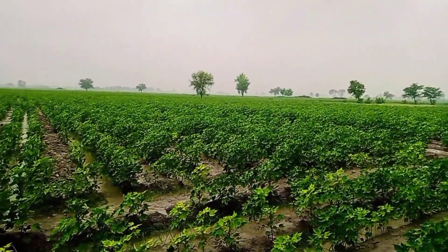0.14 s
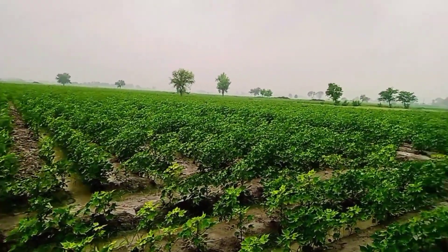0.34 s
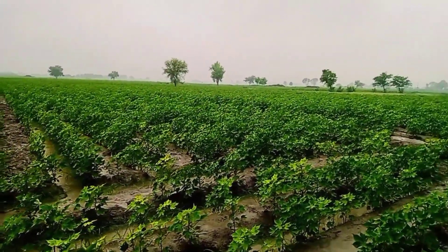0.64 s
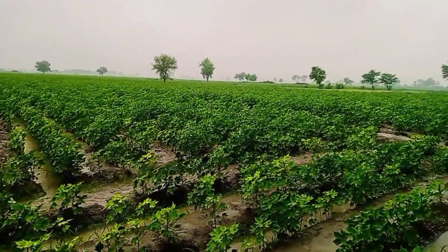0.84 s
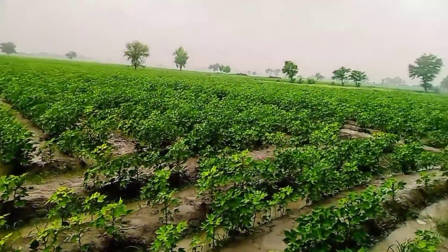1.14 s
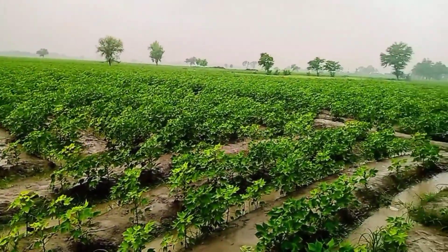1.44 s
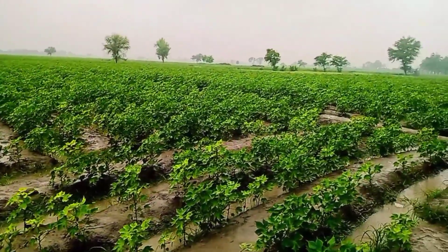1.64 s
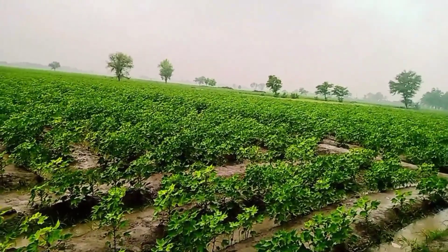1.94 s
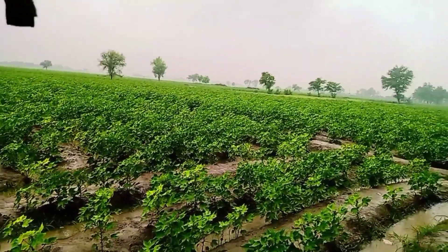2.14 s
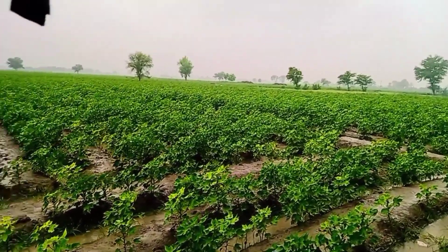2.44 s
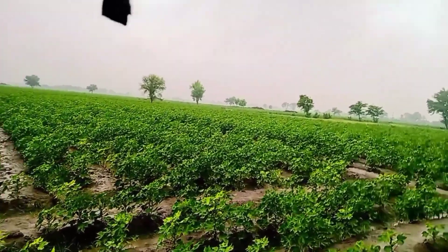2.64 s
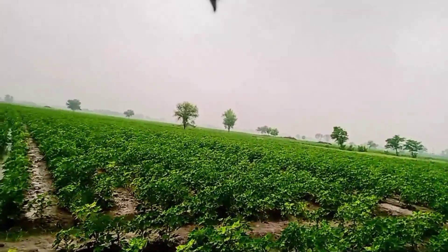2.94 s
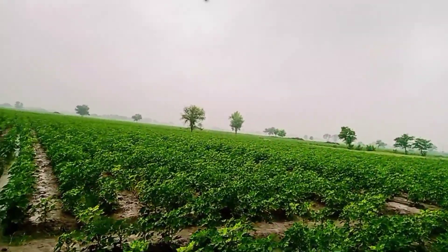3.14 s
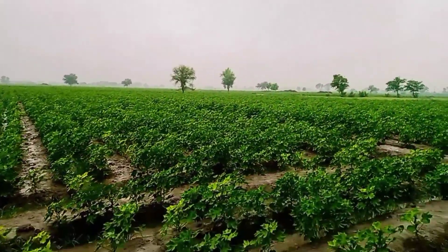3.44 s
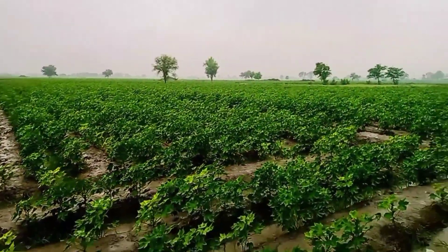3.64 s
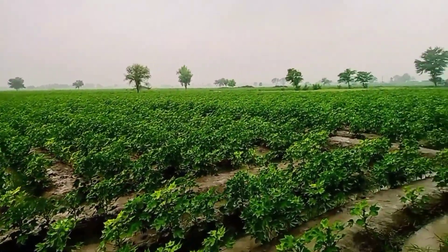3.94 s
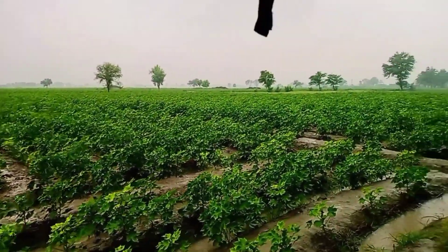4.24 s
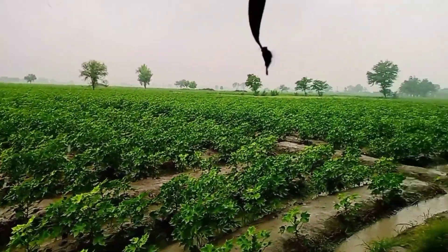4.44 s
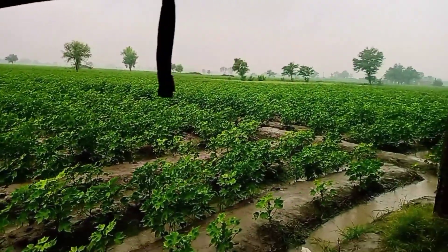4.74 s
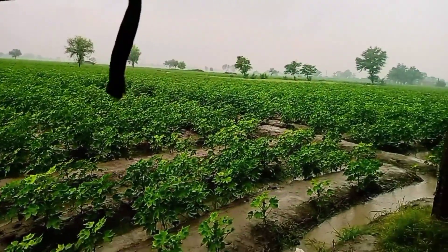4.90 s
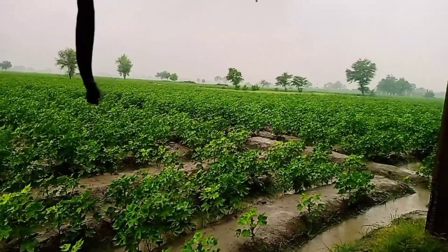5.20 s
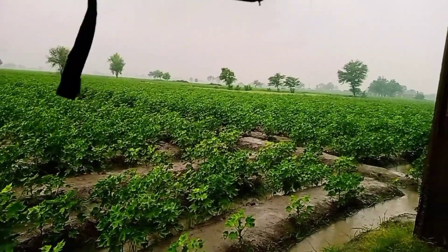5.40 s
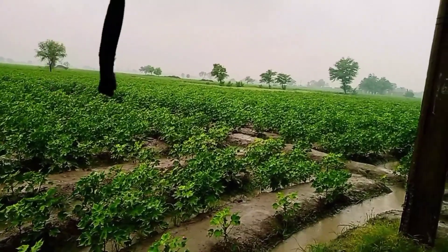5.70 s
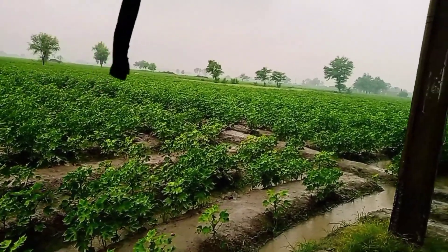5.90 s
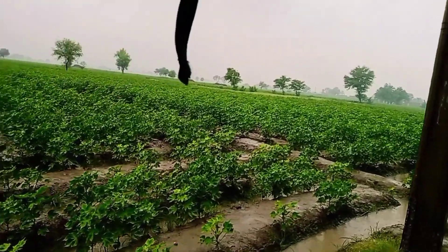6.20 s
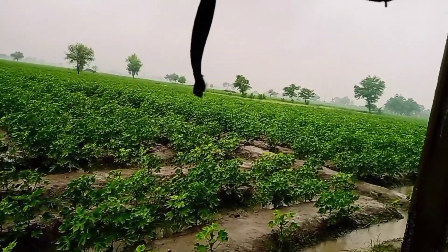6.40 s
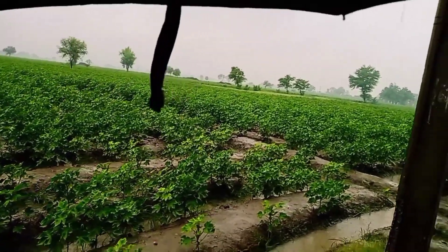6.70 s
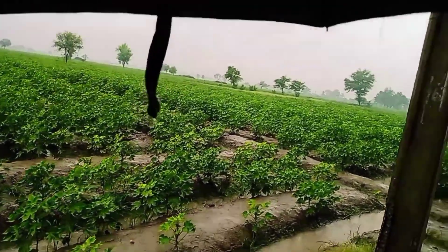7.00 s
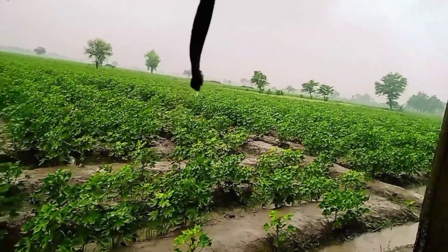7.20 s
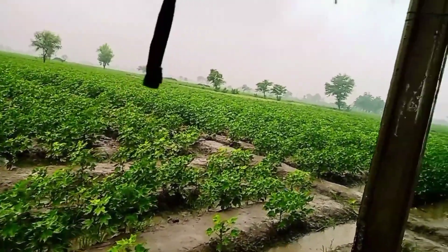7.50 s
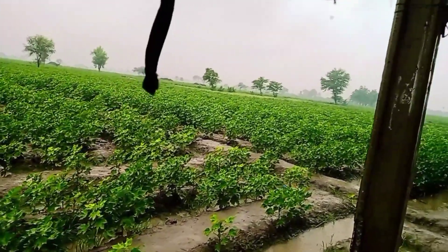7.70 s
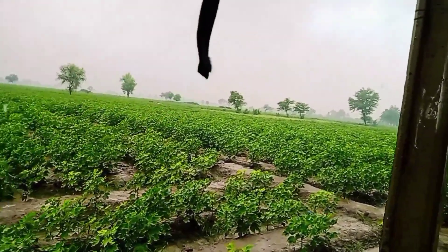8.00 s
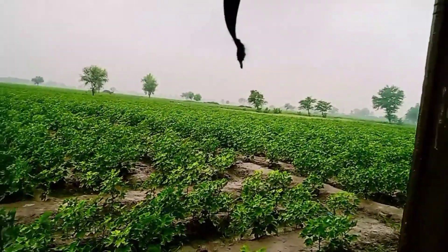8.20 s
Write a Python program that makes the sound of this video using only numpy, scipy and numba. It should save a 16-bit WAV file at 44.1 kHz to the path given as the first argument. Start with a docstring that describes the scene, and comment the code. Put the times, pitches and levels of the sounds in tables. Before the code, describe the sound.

Under a small cloth cover, heavy drips knock and plop close by against soft continuous rain, with faint far whistles and three bright bird chirps.

```python
"""Steady rain on leafy, muddy fields, heard from under a small cloth shelter.
From the start, far rain hisses (shaped noise), low wind rumbles and near drops patter (short rings).
Fat drips soon thud on the taut cloth (rings and noise bursts), most crowded from about 4.5 to 7.5 s.
Far birds whistle from 0.5 s, a near bird chirps three times from 0.6 s (gliding sines), and a cricket
trills twice from 0.8 s (overlapping high rings). A gain control ducks the hiss after the loudest drips."""
import sys
import numpy as np
from scipy import signal
from scipy.fft import rfft, irfft
from scipy.io import wavfile
from scipy.ndimage import uniform_filter1d
from numba import njit

SR = 44100
rng = np.random.default_rng(int(sys.argv[2]) if len(sys.argv) > 2 else 0)


def put_to_file(sound):
    """Save the sound as 16-bit audio at rate SR, in the file named by the first command-line argument."""
    columns = np.atleast_2d(sound).T  # one column per channel
    safe = np.clip(columns, -1, 1)
    whole_steps = np.round(safe * 32767)
    wavfile.write(sys.argv[1], SR, whole_steps.astype(np.int16))


N = 368214
ATTACK_S = 0.008  # bird notes swell for this long
SILENT_DB = -14.5  # level at the ends of a bird note, against its full level


def undb(db):
    """Turn decibels into a gain factor."""
    return 10 ** (np.asarray(db) / 20)


def unit(x):
    """Scale a sound to an rms (average strength) of 1."""
    return x / np.sqrt(np.mean(x ** 2))


def tone_of(points, hz):
    """Read a (f/Hz, level/dB) table at any pitch, with pitch on a log scale as the ear hears it."""
    table_hz, table_db = np.array(points).T
    return np.interp(np.log(hz), np.log(table_hz), table_db)


def level_at(t, points):
    """Read each column of a table at times t, by straight lines between its rows."""
    s, *columns = np.transpose(points)
    return [np.interp(t, s, column) for column in columns]


def band(x, lo_hz, hi_hz):
    """Keep the sound between two pitches and weaken the rest."""
    edges = [lo_hz, min(hi_hz, 0.45 * SR)]
    return signal.sosfilt(signal.butter(2, edges, "band", fs=SR, output="sos"), x)


def walk(rate):
    """Wander at random: levels held for 1 / rate seconds, smoothed twice, with a spread near 1."""
    hold = int(SR / rate)
    steps = np.repeat(rng.standard_normal(N // hold + 1), hold)
    return 2.42 * uniform_filter1d(uniform_filter1d(steps, hold), hold)[:N]


@njit
def grains(start, hz, cycles, size, n, rise):
    """Add up sines that each swell briefly, then die by 60 dB in their number of cycles."""
    out = np.zeros(n)
    for k in range(len(start)):
        turn = 2j * np.pi * hz[k] / SR
        fade = np.log(1000.) / cycles[k] * hz[k] / SR
        slow_step = np.exp(turn - fade)
        fast_step = np.exp(turn - rise * fade)
        slow = fast = size[k] + 0j
        # the difference of a slow and a fast fade starts at nothing, swells and dies
        for i in range(start[k], min(n, start[k] + int(cycles[k] * SR / hz[k]))):
            slow, fast = slow * slow_step, fast * fast_step
            out[i] += slow.imag - fast.imag
    return out


@njit
def follow(x, attack, release):
    """Trace the loudness of a sound: rise fast, sink slowly."""
    out, level = np.empty(len(x)), 0.
    for i in range(len(x)):
        level += (x[i] - level) * (attack if x[i] > level else release)
        out[i] = level
    return out


def ring(s, hz, cycles, db):
    """Ring at times s; a soft drop pushes for a moment, so each ring swells before it fades."""
    hz = np.clip(hz, 60, 0.45 * SR)
    start = np.clip(s * SR, 0, N - 1).astype(np.int64)
    return grains(start, hz, cycles + 0 * hz, undb(db) + 0 * hz, N, 2.74)  # 0 * hz: one value per ring


def burst(s, db, t60_s, lo_hz, hi_hz):
    """Splash noise that spreads quickly from each time s, then dies by 60 dB in t60_s."""
    spread_s = 0.00031
    kick = np.zeros(N)
    np.add.at(kick, np.clip(s * SR, 0, N - 1).astype(int), undb(db))
    shape = signal.lfilter([1], [1, -np.exp(-np.log(1000) / (t60_s * SR))], kick)
    soft = np.exp(-1 / (spread_s * SR))
    shape = signal.lfilter([(1 - soft) ** 2], [1, -2 * soft, soft ** 2], shape)
    return shape * unit(band(rng.standard_normal(N), lo_hz, hi_hz))


def hiss():
    """Countless far drops blur into noise: half-octave bands swell together and flicker alone."""
    # Relative tone of the far rain: (f/Hz, level/dB)
    hiss_tone = [(65, -40), (110, -13), (174, -10), (953, -7), (1180, -17.5), (1360, 3.5), (2160, 3.5),
                 (2720, -6.5), (4140, -13), (8800, -12.5), (13400, -33), (15200, -16), (16500, -45)]
    white = rfft(rng.standard_normal(N))
    hz = np.maximum(np.fft.rfftfreq(N, 1 / SR), 1)
    coloured = white * undb(tone_of(hiss_tone, hz))
    out, swell = 0, walk(9)
    for centre in 100 * 2 ** np.arange(0, 8, 0.5):
        # each band fades smoothly into its neighbours
        share = np.cos(np.pi / 2 * np.clip(2 * np.log2(hz / centre), -1, 1)) ** 2
        flicker_db = 0.8 * swell + 1.8 * walk(45)
        out = out + undb(flicker_db) * irfft(coloured * share, N)
    return out / np.std(band(out, 1200, 2800))


def far_rain_and_wind():
    """The far hiss and the low rumble of wind, both noise that follows levels set over time."""
    # Far rain and wind over time: (t/s, hiss level/dB, wind level/dB)
    weather = [(0.0, -37, -56.5), (2.49, -38.5, -46.5), (2.67, -38, -38.5), (3.35, -39, -47),
               (4.93, -37.5, -40), (5.35, -35, -56), (6.28, -38, -40), (6.6, -42, -53), (7.65, -43, -42.5),
               (8.35, -38, -65)]
    hiss_db, wind_db = level_at(np.arange(N) / SR, weather)
    rumble = unit(band(rng.standard_normal(N), 61, 110))
    wind = undb(wind_db + 0.93 * walk(5.5)) * rumble
    return undb(hiss_db) * hiss() + wind


def patter():
    """Near drops on leaves and cloth, mostly faint; each ticks almost at once on five short pitches."""
    # Relative tone of the ticks: (f/Hz, level/dB)
    tick_tone = [(200, -6.5), (450, -2), (1000, -0.5), (2000, 11.5), (3500, -5.5), (6000, -6), (9000, -11),
                 (13000, -51), (15300, -22)]
    # Near drops over time, stronger when the cloth sheds water: (t/s, level/dB)
    busy = [(0.0, -37.5), (0.58, -35.5), (1.09, -36), (2.07, -36.5), (2.86, -32), (3.23, -36.5),
            (4.67, -36.5), (5.6, -26.5), (5.95, -32.5), (6.21, -33.5), (6.33, -36), (6.49, -36.5),
            (6.91, -36), (7.11, -40), (7.74, -37.5), (7.91, -30.5), (8.35, -41)]
    count = 2200  # drops
    when, size, place = rng.random((count, 3)).T
    drop_db = np.minimum(-4.2 * np.log(1 - size), 19)
    out = 0
    for delay, lean, long in rng.random((count, 5, 3)).transpose(1, 2, 0):
        hz = 200 * (15800 / 200) ** ((place + 0.55 * lean) % 1)  # 200 to 15800 Hz
        cycles = (5.3 + hz / 500) * (0.32 + 1.53 * long ** 2)
        tick_db = drop_db + tone_of(tick_tone, hz) + 10 * np.log10(hz)
        out = out + ring(when * N / SR + 0.008 * delay ** 3, hz, cycles, tick_db)
    busy_db, = level_at(np.arange(N) / SR, busy)
    return undb(busy_db + 1.32 * walk(22)) * unit(out)


def drips():
    """Fat drips: the cloth thuds and plops on, the strike taps, spray ticks, droplets land around it."""
    # Loud drips, levels relative within each part:
    # (t/s, tap level/dB, tap f/Hz, thud level/dB, thud f/Hz, splash level/dB)
    fat_drips = [(0.1514, -19.5, 1350, -42, 594, -52), (0.3283, -19.5, 976, -33.5, 412, -24.5),
                 (0.3533, -14, 2400, -39, 430, -45), (0.4741, -30, 960, -24.5, 910, -26.5),
                 (0.496, -16, 1960, -30.5, 450, -44), (0.8883, -5.5, 1066, -16.5, 315, -19.5),
                 (0.9757, -25, 2000, -46, 594, -25.5), (1.5526, -31, 890, -29.5, 890, -27),
                 (1.7973, -12, 3020, -28.5, 420, -18.5), (1.9444, -20, 2240, -24.5, 410, -40),
                 (2.1029, -9, 3350, -29, 536, -10), (2.1279, -11, 2180, -26.5, 790, -42),
                 (2.1457, -16.5, 2280, -33, 433, -28), (2.2707, -19, 1360, -40, 460, -24),
                 (2.5286, -13.5, 1850, -47, 711, -37), (2.5454, -11.5, 1330, -33, 750, -38),
                 (2.5653, -13, 1300, -33.5, 694, -34), (2.7485, -9.5, 2430, -14.5, 314, -21),
                 (2.837, -13.5, 2420, -32.5, 315, -25), (2.9766, -15, 1560, -26.5, 510, -50),
                 (3.0834, -21, 1440, -31.5, 480, -40), (3.6611, -21, 2260, -35.5, 216, -25),
                 (3.683, -15.5, 1790, -36, 510, -25), (4.011, -22, 1980, -36, 859, -27),
                 (4.2538, -22, 1480, -30.5, 842, -38), (4.3035, -18, 1560, -37, 810, -37),
                 (4.337, -17, 1290, -27.5, 695, -33), (4.523, -13, 885, -12.5, 680, -24),
                 (4.6012, -19, 1820, -28, 804, -26), (4.6164, -6.5, 1380, -21, 750, -14),
                 (4.7186, -2.5, 2030, -14.5, 526, -45.5), (4.7688, -4.5, 2200, -20.5, 770, -38),
                 (4.8758, -24, 1860, -34, 517, -23.5), (4.913, -16, 900, -21, 426, -43),
                 (4.9488, -11.5, 1530, -31, 237, -43), (4.9806, -14.5, 1680, -32, 540, -31),
                 (4.996, -12.5, 2910, -18.5, 316, -17.5), (5.0193, -15, 1770, -28.5, 369, -15.5),
                 (5.0903, -16.5, 1400, -29.5, 726, -38), (5.1506, -19, 2080, -33, 345, -37),
                 (5.1745, -18, 2110, -26, 271, -23.5), (5.215, -15, 870, -25, 325, -22),
                 (5.3133, -7.5, 2860, -20, 420, -35), (5.3211, -6, 1830, -32, 300, -31),
                 (5.3673, -9.5, 964, -16, 310, -33), (5.425, -13, 1130, -20, 557, -24),
                 (5.4991, -17, 2050, -38, 412, -22.5), (5.5498, -8, 2000, -16, 626, -35),
                 (5.5735, -7.5, 1350, -20.5, 393, -17.5), (5.5957, -6, 2200, -21, 714, -23),
                 (5.659, -5, 890, -14, 523, -37), (5.6931, -6, 1000, -14.5, 446, -26),
                 (5.701, -7, 950, -16, 450, -31), (5.7559, -9, 920, -17.5, 340, -20),
                 (5.8165, -17, 1320, -23.5, 193, -13), (6.0433, -21, 1830, -10.5, 512, -23),
                 (6.0683, -7.5, 2640, -18, 433, -30), (6.0802, -11.5, 1000, -34, 818, -21),
                 (6.0944, -22, 1460, -47, 727, -17), (6.118, -10, 2240, -40, 851, -22),
                 (6.1591, -10, 2030, -35, 583, -25), (6.1778, -6.5, 1840, -11, 630, -23),
                 (6.2313, -3, 2100, -15.5, 395, -16.5), (6.3064, -10, 930, -19, 813, -24),
                 (6.3303, 0, 2100, -13, 800, -22), (6.357, -9, 2110, -34, 376, -33),
                 (6.5322, -11.5, 1970, -37.5, 242, -18.5), (6.7115, -16, 1780, -36, 425, -26),
                 (6.7705, -21.5, 1780, -31.5, 630, -49), (6.8669, -11.5, 2730, -35.5, 238, -24.5),
                 (7.0115, -15.5, 1370, -26, 343, -22.5), (7.0314, -14.5, 1480, -33, 423, -22.5),
                 (7.0817, -6, 1110, -20, 430, -20), (7.1822, -10, 1760, -24, 237, -39),
                 (7.2875, -5.5, 2090, -23, 650, -24), (7.3573, -16, 2040, -33.5, 447, -23.5),
                 (7.389, -12, 1930, -27, 674, -34), (7.671, -26, 1710, -55, 762, -25.5),
                 (7.7986, -24, 1330, -30, 288, -30), (7.8295, -13.5, 1750, -23.5, 804, -41),
                 (7.8492, -9, 2140, -24, 604, -24), (7.8718, -10.5, 1520, -26.5, 280, -44),
                 (8.0021, -27, 850, -22, 840, -22.5), (8.134, -12, 1670, -27, 690, -20.5),
                 (8.327, -13, 1940, -34, 899, -33)]
    # Wet cloth under spray, before random spread: (f/Hz, relative level/dB, shortest 60 dB fade/s)
    wet_cloth = [(3870, -2.5, 0.0098), (4880, -13.5, 0.016), (6100, -16, 0.013), (7970, -21, 0.01),
                 (9130, -17.5, 0.011)]
    s, tap_db, tap_hz, thud_db, thud_hz, splash_db = np.transpose(fat_drips)
    # the tap, the short thud and the plop that rings on
    out = ring(s, tap_hz, 18, tap_db + 7)
    out += ring(s, 1.153 * thud_hz, 3.73, thud_db + 19)
    out += ring(s, thud_hz, 14.8, thud_db + 10)
    # noise of thud, tap and splash
    out += burst(s, thud_db + 0.5, 0.095, 151, 770)
    out += burst(s, tap_db - 10, 0.047, 1120, 2920)
    out += burst(s, splash_db + 0.5, 0.013, 2800, 7100)
    out += burst(s, splash_db - 18, 0.12, 4360, 6350)
    out += burst(s, splash_db - 19, 0.012, 14700, 17500)
    # four droplets, from 4 ms before the drip to 41 ms after
    for delay, lean, weak in rng.random((len(s), 4, 3)).transpose(1, 2, 0):
        landing = s - 0.004 + 0.045 * delay
        bend = 0.653 + 0.93 * lean
        out += ring(landing, tap_hz * bend, 13.5, tap_db - 5.5 - 11 * weak)
        out += ring(landing, thud_hz * bend, 8.8, thud_db + 5.5 - 11 * weak)
    # spray ticks on the wet cloth; the weaker, the longer
    chance = rng.random((len(s), len(wet_cloth), 3)).transpose(1, 2, 0)
    for (hz, db, t60_s), (delay, lean, weak) in zip(wet_cloth, chance):
        spray_hz = hz * (0.911 + 0.111 * lean)
        cycles = t60_s * hz * (1 + 5.5 * weak ** 2)
        out += ring(s + 0.02 * delay ** 2, spray_hz, cycles, splash_db + db + 13.5 - 13 * weak)
    return out


def note(start, length, start_hz, end_hz, db, buzz=0):
    """One gliding note that swells and fades, as (t/s, f/Hz, level/dB, buzz 0-1) points."""
    points = []
    for s, dip in [(0, SILENT_DB), (ATTACK_S, 0), (length - ATTACK_S, 0), (length, SILENT_DB)]:
        hz = start_hz + (end_hz - start_hz) * s / length
        points.append((start + s, hz, db + dip, buzz))
    return points


def bird(calls, echo_db):
    """Near-sine whistles; a buzz shakes the pitch and deepens the flutter; bushes return a short echo."""
    t, out = np.arange(N) / SR, np.zeros(N)
    shake_hz = 330 * (1 + 0.17 * walk(60))
    shake = np.sin(2 * np.pi * np.cumsum(shake_hz) / SR)
    flutter = np.clip(walk(170), -2.5, 1.5)
    for call in calls:
        on = (t > call[0][0]) & (t < call[-1][0])
        hz, db, buzz = level_at(t[on], call)
        shaken_hz = hz + 640 * buzz * shake[on] + 30 * flutter[on]
        phase = 2 * np.pi * np.cumsum(shaken_hz) / SR
        gain = undb(db + (2 + 1.7 * buzz) * flutter[on])
        out[on] += np.sqrt(2) * gain * np.sin(phase)
    lag = t[:SR // 4]
    echo = rng.standard_normal(len(lag)) * np.exp(-np.log(1000) * lag / 0.22)  # fades 60 dB in 0.22 s
    echo /= np.sqrt(np.sum(echo ** 2))
    return out + undb(echo_db) * signal.fftconvolve(out, echo)[:N]


def far_birds():
    """Far birds: plain whistles that hold or gently glide in pitch, with an echo."""
    # Far whistles: (start t/s, length/s, start f/Hz, end f/Hz, level/dB)
    far_calls = [(0.494, .05, 1960, 1950, -36), (0.573, 0.079, 1916, 1915, -33),
                 (0.644, 0.066, 2090, 2090, -35.5), (2.475, 0.056, 1342, 1400, -38.5),
                 (2.678, 0.077, 1630, 1697, -34.5)]
    return bird([note(*row) for row in far_calls], echo_db=-5)


def chirp(start, whistle, whistle_db, break_hz, buzz, buzz_db):
    """Lead notes, then a whistle that rises and swells, jumps up in pitch and buzzes away."""
    # Two faint notes ahead of every chirp:
    # (lead/s, length/s, start f/Hz, end f/Hz, level/dB, buzz 0-1)
    lead_notes = [(.087, 0.086, 5750, 5700, -46, .3), (0.052, 0.036, 4250, 4800, -44, 0.4)]
    whistle_start_hz, buzz_start_hz, buzz_top_hz, buzz_end_hz = 4575, 5980, 6350, 6000
    break_s, buzz_rise_s = 0.006, 0.0208
    onset_db = -6.5  # against the level of the whistle
    buzz_at_break, buzz_full = 0.2, 0.58  # share 0-1
    flip = start + whistle
    main = [(start - ATTACK_S, whistle_start_hz, whistle_db + SILENT_DB, 0),
            (start, whistle_start_hz, whistle_db + onset_db, 0),
            (flip, break_hz, whistle_db, buzz_at_break),
            (flip + break_s, buzz_start_hz, buzz_db, buzz_full),
            (flip + buzz_rise_s, buzz_top_hz, buzz_db, buzz_full),
            (flip + buzz, buzz_end_hz, buzz_db + SILENT_DB, buzz_full)]
    return [main] + [note(start - lead, *rest) for lead, *rest in lead_notes]


def near_bird():
    """A near bird: a rising whistle that breaks into a buzz, with an echo."""
    # Chirps: (start t/s, whistle length/s, whistle level/dB, f at the break/Hz,
    # buzz length/s, buzz level/dB)
    chirps = [(.716, .034, -20.5, 5120, 0.073, -22), (3.32, 0.059, -20.5, 5110, 0.064, -24),
              (5.642, .054, -19, 5370, 0.054, -20.5)]
    calls = []
    for row in chirps:
        calls += chirp(*row)
    return bird(calls, echo_db=-6)


def cricket():
    """Slightly uneven wing strokes, each a high ring that runs into the next."""
    # Trills: (start t/s, end t/s, relative level/dB)
    trills = [(.83, 1.57, -55), (3.26, 3.82, -57)]
    wing_hz, strokes_per_s = 10180, 61
    out = 0
    for start, end, db in trills:
        s = np.arange(start, end, 1 / strokes_per_s)
        s = s + 0.003 * rng.standard_normal(len(s))
        hz = wing_hz + 40 * rng.standard_normal(len(s))
        stroke_db = db + 14 + 3 * rng.standard_normal(len(s))
        out = out + ring(s, hz, 300, stroke_db)
    return band(out, 9950, 10400)


def scene():
    """Add all sources, nearly mono: only the treble differs a little between left and right."""
    mid = far_rain_and_wind() + patter() + drips()
    mid += far_birds() + near_bird() + cricket()
    # the microphone is deaf to deep bass
    mid = signal.sosfilt(signal.butter(2, 80, "high", fs=SR, output="sos"), mid)
    # a short random smear makes the faint left-right difference
    scatter = rng.standard_normal(300) * np.exp(-np.arange(300) / 60)
    stray = np.convolve(mid, scatter / np.sqrt(np.sum(scatter ** 2)))[:N]
    side = undb(-31) * band(band(band(stray, 9400, 20000), 5000, 17000), 4400, 17000)
    return np.array([mid + side, mid - side])


def record(dry):
    """Gain control turns loud drips and what follows down; peaks clip; the top is dulled, then cut."""
    attack_s, release_s, threshold_db = 0.0024, 0.12, -20.5
    top_hz = 17100
    loud = follow(np.abs(dry).max(axis=0), 1 / (attack_s * SR), 1 / (release_s * SR))
    gain = np.minimum(1, undb(threshold_db) / (loud + 1e-9)) ** 0.26  # 0.26 dB down per dB over
    wet = np.clip(dry * gain, -1, 1)
    shelf = signal.ellip(6, 0.3, 22, 15850, fs=SR, output="sos")
    cut = signal.ellip(8, 0.2, 70, top_hz, fs=SR, output="sos")
    return signal.sosfilt(np.vstack([shelf, cut]), wet)


dry = scene()
out = record(dry)
put_to_file(out)
```